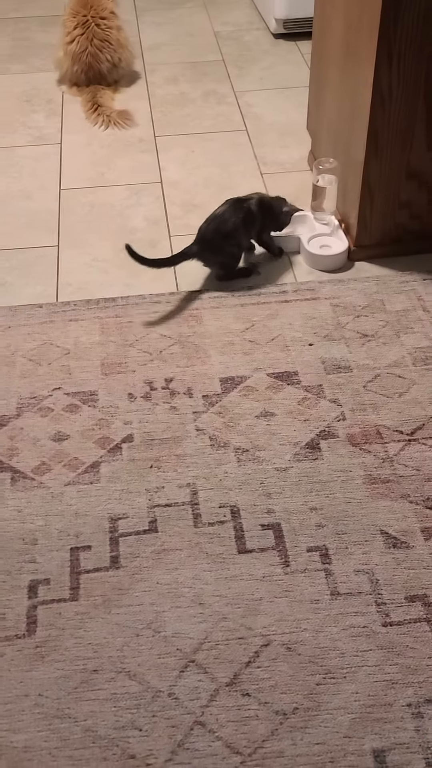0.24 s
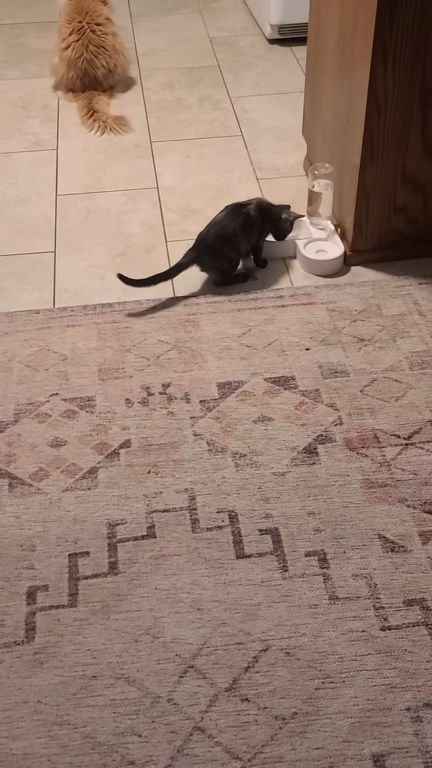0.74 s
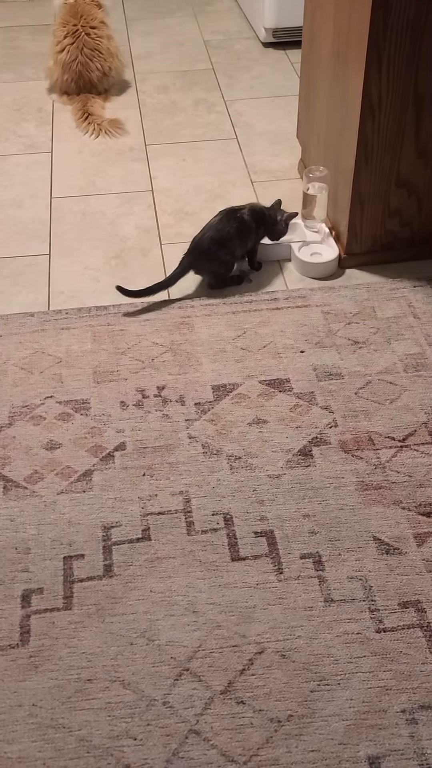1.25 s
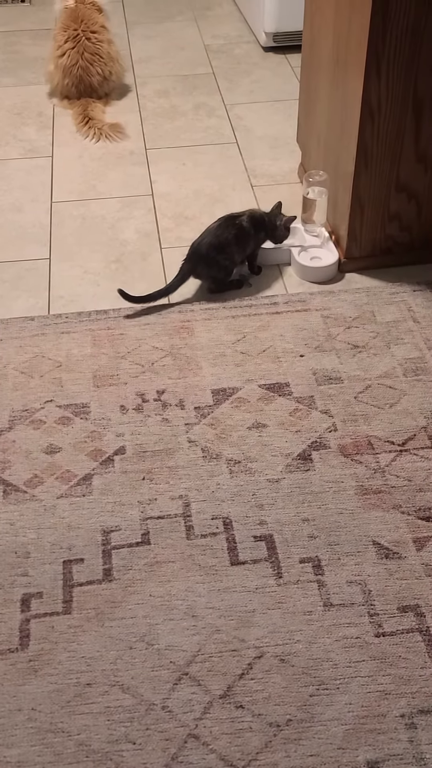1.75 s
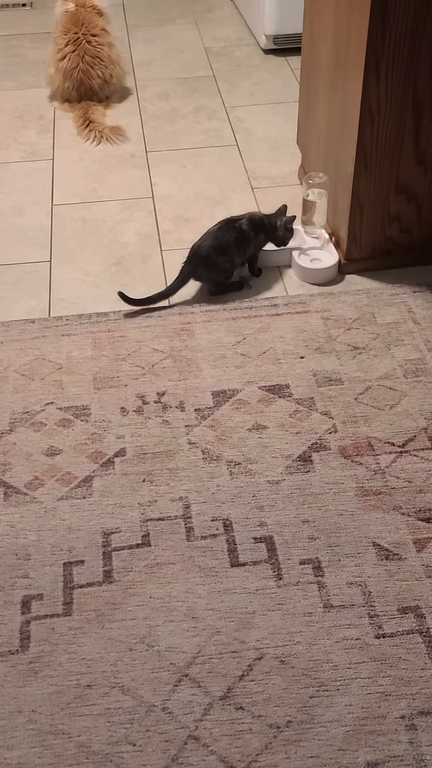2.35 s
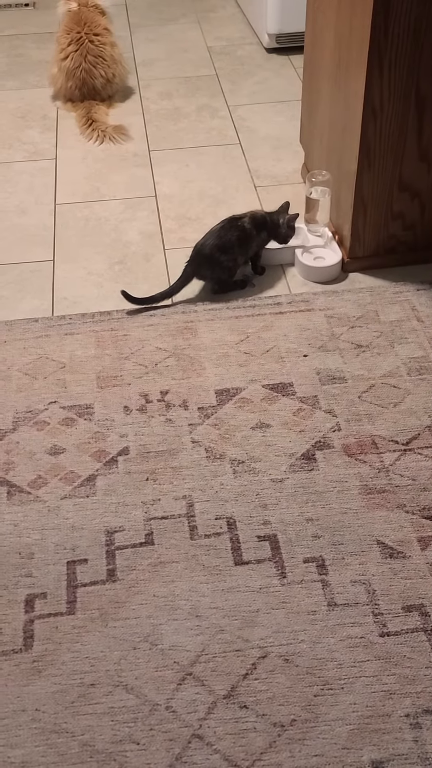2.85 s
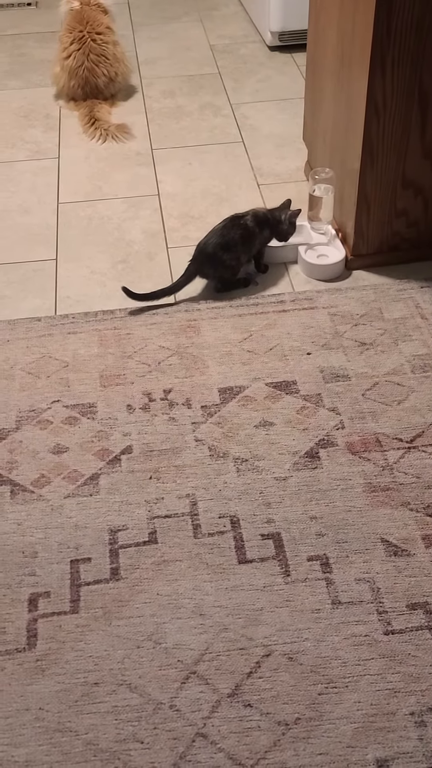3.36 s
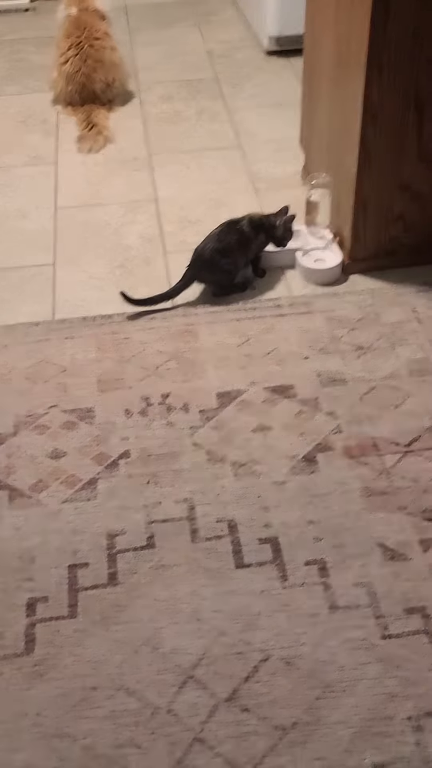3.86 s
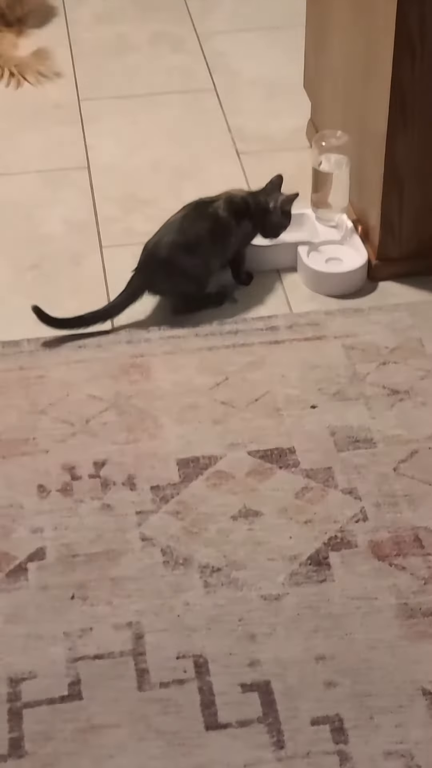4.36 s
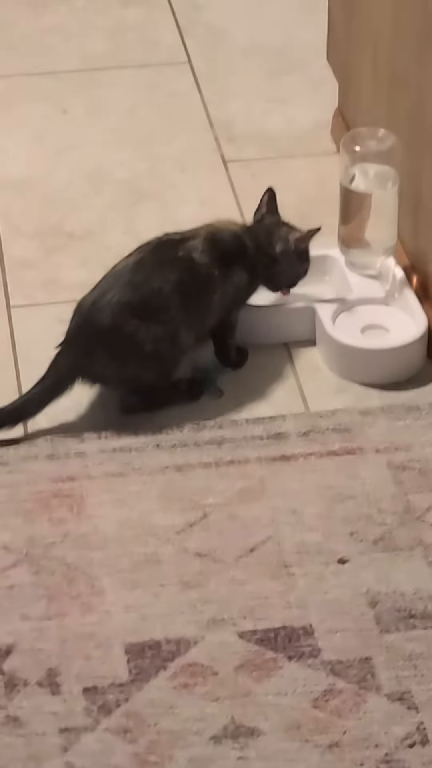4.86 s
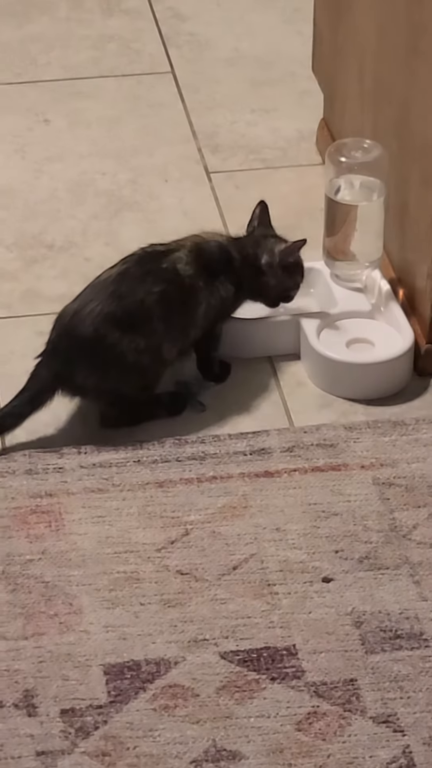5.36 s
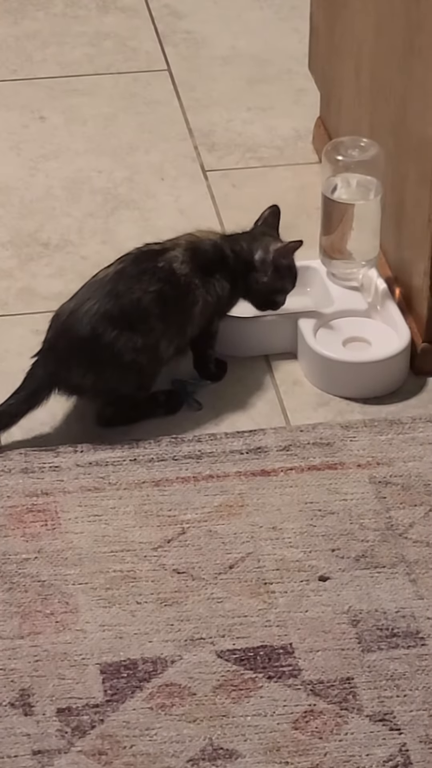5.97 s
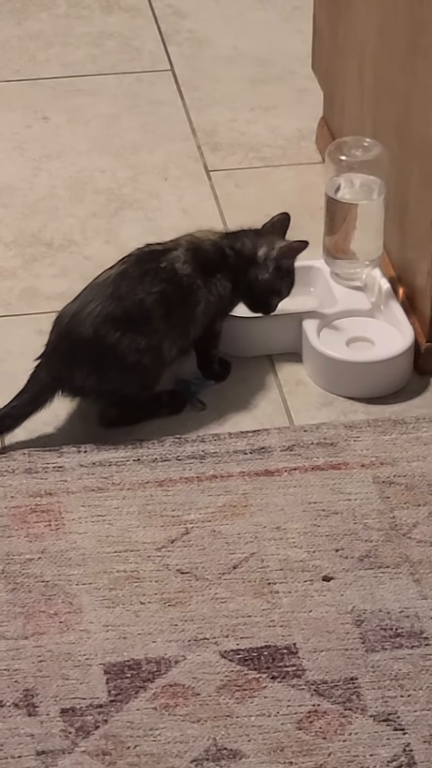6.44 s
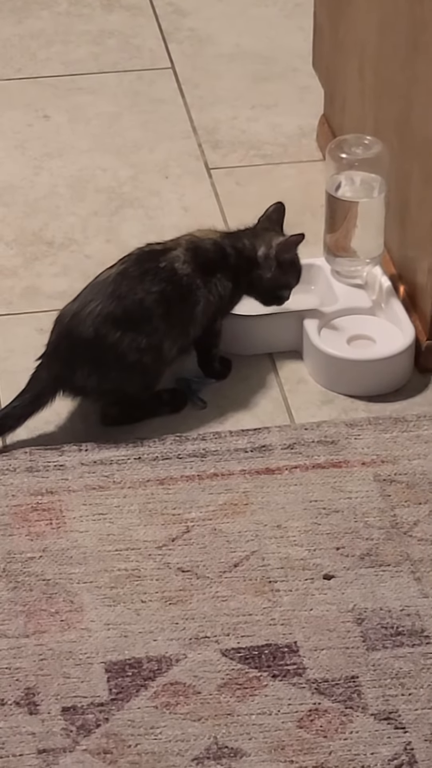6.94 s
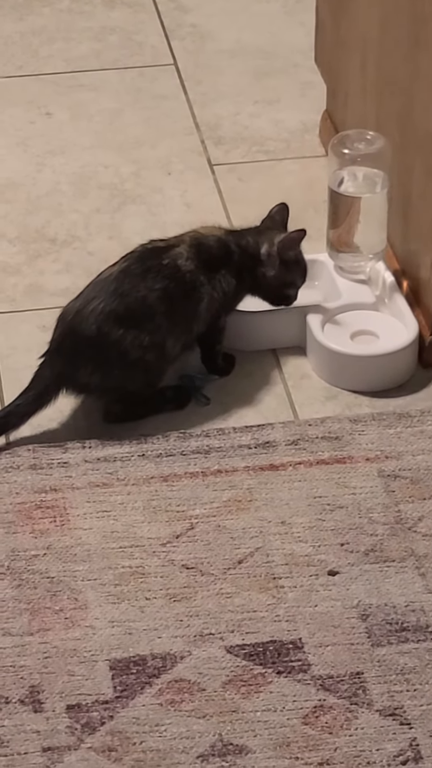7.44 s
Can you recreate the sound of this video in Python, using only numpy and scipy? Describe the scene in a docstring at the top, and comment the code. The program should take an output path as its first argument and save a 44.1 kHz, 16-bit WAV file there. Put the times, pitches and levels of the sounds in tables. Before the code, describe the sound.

A refrigerator hums throughout in a quiet tiled kitchen: a deep steady drone with slightly fluttering motor tones, a soft rush of air and thin microphone hiss. At 0 seconds there is a tiny rustle. A kitten noses and licks faintly at its plastic bowl, with small grainy ticks near 1.4, 2.7 and 3.1 seconds, almost hidden. From about 3.6 to 4.0, fingers touch the handheld device: a light click, sharper taps, a heavy dull thump near 3.9 and a few crisp ticks, close to the right microphone, with skin rubbing on glass. Between 4.0 and 4.3 the hum swells several decibels closer, while another soft slide passes. A hard tap lands at 4.4, with a faint low bump around 4.7. Afterwards the louder hum holds steady, with faint nudges from 5.2 to 7.4 and a short low bump at 7.6.

```python
"""Kitchen hum, kitten and a zoom

A refrigerator hums in a quiet tiled kitchen: steady motor partials over a rush of filtered noise.
After a short opening rustle a kitten noses faintly at its plastic bowl, in short grainy noises. Halfway
through, fingers tap and slide on the phone to zoom in: filtered clicks ring the casing by the right
microphone and noise rubs on glass. The zoom also turns the microphones up, so the hum comes closer."""
import sys
import numpy as np
from scipy import signal
from scipy.fft import rfft, irfft, next_fast_len
from scipy.io import wavfile
from scipy.ndimage import uniform_filter1d

SR = 44100
rng = np.random.default_rng(int(sys.argv[2]) if len(sys.argv) > 2 else 0)


def to_wav(s):
    """Save 16-bit WAV."""
    ch = np.atleast_2d(s).T  # columns
    pcm = np.round(np.clip(ch, -1, 1) * 32767)  # PCM
    wavfile.write(sys.argv[1], SR, pcm.astype(np.int16))


N = 339549
TIME = np.arange(N) / SR

# grainy bursts, first the opening rustle, then the kitten's licks and nudges at the bowl:
# (time [s], level [dB], length [s], pitch [Hz], width of each pass [Hz])
GRAINY_BURSTS = [(0.0, -55, 0.027, 1300, 2990), (0.07, -71, .06, 7000, 1500),
                 (1.414, -67, .012, 7040, 4000), (2.735, -69, .025, 7200, 3000),
                 (3.115, -65.5, 0.027, 6340, 900), (4.728, -69, .01, 4970, 3000),
                 (5.186, -62, 0.03, 3020, 850), (5.188, -66, 0.037, 5900, 1600),
                 (5.405, -67.5, 0.026, 4000, 1600), (5.864, -68, 0.022, 3600, 1000),
                 (6.647, -69, .025, 4400, 1300), (6.65, -65, 0.05, 6550, 1100),
                 (6.88, -70, 0.027, 4500, 3500), (7.205, -68, 0.048, 4430, 900),
                 (7.435, -70, 0.028, 4250, 900)]


def from_db(db):
    """Decibels to gain."""
    return 10 ** (np.asarray(db) / 20)


def rms_one(x):
    """Scale to unit power."""
    return x / np.sqrt(np.mean(x ** 2) + 1e-20)


def at_hz(points, hz, axis=1):
    """Read one column of a spectrum on a log-frequency axis."""
    table = np.array(points)
    return np.interp(np.log(hz + 1), np.log(table[:, 0]), table[:, axis])


def butter(x, hz, kind, order=2):
    """Causal Butterworth filter."""
    return signal.sosfilt(signal.butter(order, hz, kind, fs=SR, output="sos"), x)


def resonate(x, hz, width_hz):
    """One two-pole resonance with gain 1 on top."""
    r = np.exp(-np.pi * width_hz / SR)
    feedforward = np.array([1, 0, -1]) * (1 - r * r) / 2
    feedback = [1, -2 * r * np.cos(2 * np.pi * hz / SR), r * r]
    return signal.lfilter(feedforward, feedback, x)


def resonate_twice(x, hz, width_hz):
    """The same resonance two times over, for steeper skirts."""
    return resonate(resonate(x, hz, width_hz), hz, width_hz)


def drift(rate):
    """Slow chance with spread 1, changing about rate times a second."""
    step = 100  # samples between the slow values
    r = np.exp(-2 * np.pi * rate * step / SR)
    chance = rng.standard_normal(N // step + 2002)
    slow = signal.lfilter([1], [1, -2 * r, r * r], chance)[2000:]  # skip the settling
    return np.interp(np.arange(N) / step, np.arange(len(slow)), rms_one(slow))


def swell(start, length):
    """An envelope that rises to 1 at half its length, then dies away more gradually."""
    age = np.clip((TIME - start) / (length / 2), 0, 20)
    return age * np.exp(1 - age)


def treble_ripple(hz, spacing_hz=30, ripple_db=3.5):
    """A fixed fine random ripple in the treble, different in each channel."""
    knots = np.arange(0, SR, spacing_hz)
    ripple = np.array([np.interp(hz, knots, row) for row in rng.standard_normal((2, len(knots)))])
    depth = np.interp(hz, [400, 1200, 7500, 11000], [0, 1, 1, .5])
    gain = from_db(ripple_db * depth * ripple)
    local_power = uniform_filter1d(gain ** 2, size=4001)
    return gain / np.sqrt(local_power)


def stereo_noise(spectrum):
    """Noise with a colour for each channel; long waves reach both microphones alike."""
    # likeness of the two channels: (frequency [Hz], coherence [0-1])
    likeness = [(60, 0.9), (200, 0.95), (380, 0.79), (700, 0.078), (1300, 0)]
    size = next_fast_len(N)
    hz = np.arange(size // 2 + 1) * SR / size
    mid, side = rfft(rng.standard_normal((2, size)))
    alike = at_hz(likeness, hz)
    pair = np.sqrt(1 + alike) * mid + np.sqrt(1 - alike) * side * [[1], [-1]]
    colour = from_db([at_hz(spectrum, hz, axis=1), at_hz(spectrum, hz, axis=2)])
    noise = irfft(pair * colour * treble_ripple(hz), size)[:, :N]
    return noise * np.sqrt(SR) / 2  # makes the spectrum a power per Hz


def motor(partials, hz, wander, wander_rate, flutter_db, flutter_rate):
    """Whole-number partials locked to one slightly unsteady shaft, each wavering in level."""
    angle = 2 * np.pi * np.cumsum(hz * (1 + wander * drift(wander_rate))) / SR
    out = np.zeros((2, N))
    for multiple, left_db, right_db, lag in partials:
        phase = round(multiple) * angle + rng.uniform(0, 2 * np.pi)
        waver = np.sqrt(2) * from_db(flutter_db * drift(flutter_rate))  # root 2: levels are RMS
        out += waver * from_db([[left_db], [right_db]]) * np.sin([phase, phase - lag])
    return out


def compressor(shaft_hz=59.17):
    """The compressor's shaft sounds a long series of partials, fluttering in level."""
    # partials: (multiple of the shaft rate, rounded in use [ratio], left [dB], right [dB], right lag [rad])
    shaft_partials = [(1, -55.5, -56.5, 0.3), (5.033, -67.5, -58, 1), (6.02, -64.5, -67, 1.5),
                      (6.994, -57, -55.5, 0), (8.02, -66, -61.5, 0.96), (8.91, -72, -58, 2.5),
                      (10, -79.5, -78, 0.5), (11.01, -68, -67.5, 2.5), (12.09, -68.5, -61, 2.5),
                      (13.05, -76, -74.5, 1.5), (14.95, -86, -70.5, 4.5), (15.9, -78, -68, -4),
                      (16.86, -79, -76, 1.5), (20.2, -75, -80, -1.5), (20.3, -86.5, -81.5, 0.5),
                      (21.84, -88.5, -77.5, 5), (24.97, -86.5, -89, 1), (28.8, -73.5, -94, 2.5),
                      (32.9, -84.5, -88, 0), (45, -90.5, -91.5, -4.5), (54, -84.5, -87, -2),
                      (63.1, -90, -86.5, 3.5), (79, -84, -93, 4.5)]
    return motor(shaft_partials, shaft_hz, wander=0.00035, wander_rate=1.2, flutter_db=3.0, flutter_rate=4.3)


def fan(turning_hz=80.93):
    """The fan hums on a few low multiples of its turning rate."""
    # partials: (multiple of the turning rate [ratio], left [dB], right [dB], right lag [rad])
    fan_partials = [(2, -38.5, -37.5, 0.12), (3, -57.5, -55, -0.13), (4, -56, -52, 0.67)]
    return motor(fan_partials, turning_hz, wander=0.0015, wander_rate=2.12, flutter_db=1.2, flutter_rate=9.6)


def moving_air(gust_db=0.8, gust_rate=5.2, patchy_db=1.0, patchy_rate=4, patch_width=0.73):
    """Air rushes as coloured noise, swelling as a whole and separately in a few bands."""
    # rush of air: (frequency [Hz], left density [dB per Hz], right density [dB per Hz])
    air_spectrum = [(17.9, -96, -91.5), (35, -71.5, -73), (70, -71.5, -71), (150, -74, -73),
                    (215, -73.5, -73), (293, -73.5, -73), (524, -83.5, -79), (720, -88, -85),
                    (984, -93, -89), (1330, -93.5, -95), (2250, -101.5, -99.5), (2400, -100, -96),
                    (3720, -104, -103.5), (4140, -109, -108.5), (4770, -105, -111), (5560, -107, -113),
                    (7550, -126, -145)]
    # centres of the bands that swell on their own: [Hz]
    patch_centres = [910, 1700, 2830]
    air = stereo_noise(air_spectrum) * from_db(gust_db * drift(gust_rate))
    patches = np.zeros((2, N))
    for hz in patch_centres:
        extra_gain = from_db(patchy_db * drift(patchy_rate)) - 1
        patches += resonate(air, hz, patch_width * hz) * extra_gain
    return air + patches


def duct():
    """Flow noise sets the air duct humming at its resonances, alike in both channels."""
    # resonances: (frequency [Hz], width of each pass [Hz], level [dB])
    duct_modes = [(243.6, 20, -58), (323.5, 14, -59)]
    flow = rng.standard_normal(N)
    return sum(from_db(db) * rms_one(resonate_twice(flow, hz, width)) for hz, width, db in duct_modes)


def fridge():
    """Compressor and fan over the rush of air and the humming duct."""
    return compressor() + fan() + moving_air() + duct()


def hiss(waver_db=0.4, waver_rate=4):
    """The microphones' own hiss, nearly steady."""
    # hiss with treble peaks: (frequency [Hz], left density [dB per Hz], right density [dB per Hz])
    hiss_spectrum = [(6000, -116, -122), (6040, -100, -111), (6580, -95.5, -110), (7340, -104, -115),
                     (7630, -116, -136), (8200, -116, -138), (8400, -117, -124), (10300, -131, -120),
                     (10750, -119, -113), (13200, -115, -115), (15400, -118, -118)]
    return butter(stereo_noise(hiss_spectrum), 5400, "high") * from_db(waver_db * drift(waver_rate))


def grainy_noise(grain_db=4.0, grain_rate=130):
    """Stereo noise whose level flickers fast and irregularly."""
    grain = rms_one(from_db(2 * grain_db * np.tanh(drift(grain_rate) / 2)))
    return grain * rng.standard_normal((2, N))


def grainy_burst(grainy, s, db, length, hz, width_hz):
    """One short swell of grainy noise in a resonance."""
    rustle = butter(resonate_twice(grainy, hz, width_hz), 7300, "low", order=8)
    return from_db(db) * swell(s, length) * rms_one(rustle)


def opening_rustle():
    """A short rustle at the very start, a single burst of grainy noise."""
    return grainy_burst(grainy_noise(), *GRAINY_BURSTS[0])


def kitten(licking_db=-76, licking_swing_db=5.5, licking_rate=9):
    """Each lick or nudge is a grainy burst; fainter licking runs throughout."""
    grainy = grainy_noise()
    nudges = sum(grainy_burst(grainy, *nudge) for nudge in GRAINY_BURSTS[1:])
    licking = rms_one(butter(grainy, [900, 3600], "band", order=3))
    licking_gain = from_db(licking_db + licking_swing_db * np.tanh(drift(licking_rate)))
    return nudges + licking_gain * licking


def touch(thump_db, thump_hz, click_db, corner_hz, top_hz, ring_share, node_hz, node_width=0.14,
          crack_db=-2, spread_db=3.0, dip_hz=9500, dip_width_hz=1500, bass_hz=145):
    """The finger pad pushes low; hard contact cracks and rings the casing, less at a node under the finger."""
    # ring of the casing, before a random spread: (frequency [Hz], width [Hz], level [dB])
    casing = [(550, 160, 1), (950, 170, 2.5), (1200, 120, -11), (1720, 59, 3), (2570, 160, -11),
              (3180, 43, 8.5), (4530, 580, -6.5), (6900, 560, 8.5)]
    blow = signal.unit_impulse(2048)
    thump = butter(butter(blow, thump_hz, "low", order=3), bass_hz, "high")
    contact = butter(butter(blow, corner_hz, "low", order=1), 100, "high")
    ring = np.zeros(len(blow))
    for hz, width_hz, db in casing:
        ring += from_db(db + spread_db * rng.uniform(-1, 1)) * resonate(contact, hz, width_hz)
    sharp = butter(contact, 12000, "high", order=4)
    crack = from_db(crack_db) * butter(sharp, top_hz, "low", order=1)
    click = butter(contact + ring_share * ring, top_hz, "low", order=5) + crack
    click = click - resonate(click, node_hz, node_width * node_hz)
    click = click - resonate(click, dip_hz, dip_width_hz)  # a dip in the click's treble
    click_peak, thump_peak = np.abs(click).max(), np.abs(thump).max()
    return from_db(click_db) * click / click_peak + from_db(thump_db) * thump / thump_peak


def fingers(far_db=-21, far_delay_s=0.0052, scuff_db=-38, room_db=-51):
    """Touches knock beside the right microphone, reach the left late and weakly, and trail off in noise."""
    # touches: (time [s], thump peak [dB], thump top [Hz], click peak [dB], click low-pass corner [Hz],
    #           click top [Hz], share of casing ring [ratio], node [Hz])
    touches = [(3.6403, -58, 330, -31, 700, 3500, 3, 1900),
               (3.7692, -22.5, 420, -22.5, 2200, 6000, 1.2, 4050),
               (3.8886, -30, 330, -22.5, 4200, 4550, 0.53, 2000),
               (3.8892, -12, 405, -37, 600, 1610, 1.5, 2000),
               (3.9465, -63, 330, -30.5, 1600, 14500, .8, 5800),
               (3.967, -79, 330, -31, 4000, 15500, .45, 1700),
               (3.9704, -71, 330, -30, 6000, 15500, .2, 7200),
               (3.998, -75, 330, -35, 5000, 15500, .2, 7200),
               (4.4097, -25, 398, -15.5, 427, 8750, 0.98, 4060)]
    knocks = np.zeros(N)
    for s, *contact in touches:
        sound, at = touch(*contact), round(s * SR)
        knocks[at:at + len(sound)] += sound
    age = TIME[:SR // 5]
    scuff = from_db(scuff_db) * np.exp(-age / .007) * [[.25], [1]]  # weaker on the left
    room = from_db(room_db) * np.exp(-age / 0.062)
    tails = (scuff + room) * rng.standard_normal((2, len(age)))
    trail = signal.fftconvolve(butter(knocks, 840, "high")[None], tails)[:, :N]
    far = from_db(far_db) * np.interp(TIME - far_delay_s, TIME, knocks)
    return np.array([far, knocks]) + trail


def slide(uneven_db=3.5, uneven_rate=30):
    """Skin rubs on glass under an uneven pressure; each stroke lands, holds and eases off."""
    # strokes: (time [s], level on top of the skin colour [dB], attack [s], hold [s], release [dB per s])
    strokes = [(3.74, -2, 0.017, 0.13, 38), (3.878, -5, 0.06, 0.08, 43), (4.14, -4.5, .06, .22, 28)]
    # colour of the rubbing: (frequency [Hz], left density [dB per Hz], right density [dB per Hz])
    skin_spectrum = [(40, -78.5, -67.5), (312, -92, -84), (1190, -104, -101), (3980, -109, -105),
                     (7300, -101, -108), (8000, -115, -128), (9500, -126, -121), (12000, -116, -112),
                     (15900, -118, -114)]
    power = np.zeros(N)
    for s, db, attack, hold, release_db_per_s in strokes:
        age = TIME - s
        eased_db = release_db_per_s * np.maximum(age - attack - hold, 0)
        power += (np.clip(age / attack, 0, 1) * from_db(db - eased_db)) ** 2
    pressure = np.sqrt(power) * from_db(uneven_db * drift(uneven_rate))
    return pressure * stereo_noise(skin_spectrum)


def scuffs(left_db=-12):
    """Skin catches briefly on the casing beside the right microphone, as resonant bursts of noise."""
    # scuffs: (time [s], level [dB], length [s], pitch [Hz], width of each pass [Hz])
    catches = [(3.7595, -57, .006, 6400, 1800), (3.766, -55, .007, 3000, 1800),
               (3.799, -52, 0.0064, 1040, 500), (3.8635, -50, 0.0058, 3780, 2600),
               (3.865, -51, .004, 6740, 1200), (3.897, -55, .005, 6600, 1600),
               (3.9072, -54, .003, 4000, 1800), (4.411, -61, .035, 7000, 1300)]
    friction = rng.standard_normal((2, N))
    rubs = np.zeros((2, N))
    for s, db, length, hz, width_hz in catches:
        rubs += from_db(db) * swell(s, length) * rms_one(resonate_twice(friction, hz, width_hz))
    return butter(rubs, 7800, "low", order=6) * from_db([[left_db], [0]])


def grip(left_db=-9):
    """The shifting hand rocks the phone in brief low sine bumps, most at the right microphone."""
    # dull bumps of the hand: (time [s], level [dB], length [s], pitch [Hz])
    bumps = [(3.892, -27, 0.011, 88), (4.387, -40, 0.029, 76), (4.659, -44, 0.05, 68),
             (7.603, -30, 0.013, 89)]
    rocking = np.zeros(N)
    for s, db, length, hz in bumps:
        rocking += from_db(db) * swell(s, length) * np.sin(2 * np.pi * hz * (TIME - s))
    return rocking * from_db([[left_db], [0]])


def zoom_gain(start_s=4.02, ramp_s=0.3, wide_db=-6.5, close_db=0.3):
    """The zoom's microphone gain: steady when wide, one even ramp in decibels, steady when close."""
    progress = np.clip((TIME - start_s) / ramp_s, 0, 1)
    return from_db(wide_db + (close_db - wide_db) * progress)


def scene():
    """Room, hiss and handling sounds under the zoom gain, with the fingers' sliding on top."""
    heard = fridge() + hiss() + opening_rustle() + kitten() + fingers() + scuffs() + grip()
    return zoom_gain() * heard + slide()


def record(dry):
    """The top is cut steeply above 15750 Hz by an elliptic low-pass."""
    return signal.sosfilt(signal.ellip(12, .1, 80, 15750, fs=SR, output="sos"), dry)


dry = scene()
out = record(dry)
to_wav(out)
```